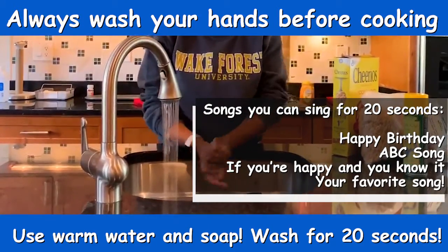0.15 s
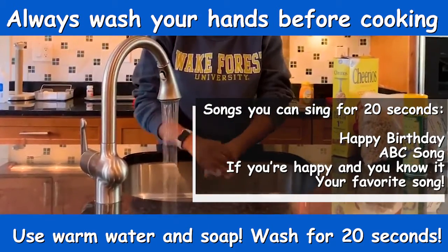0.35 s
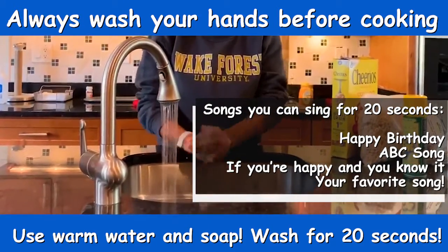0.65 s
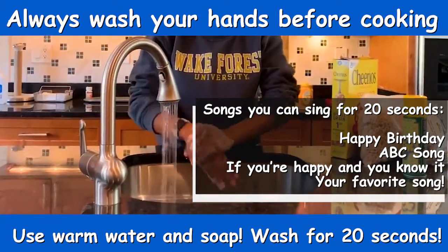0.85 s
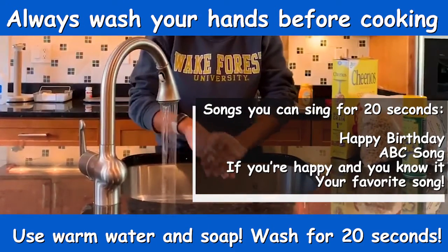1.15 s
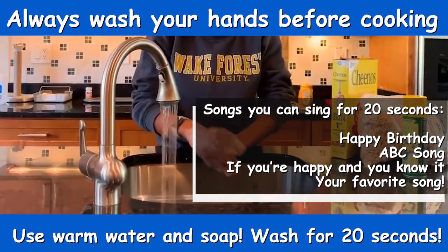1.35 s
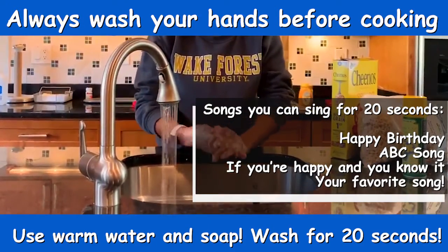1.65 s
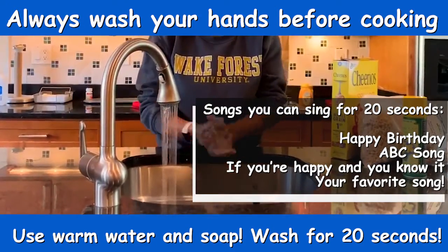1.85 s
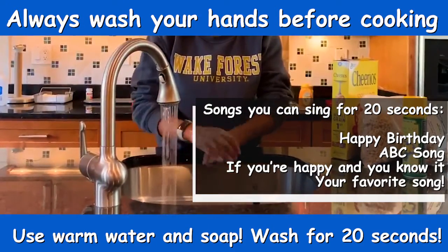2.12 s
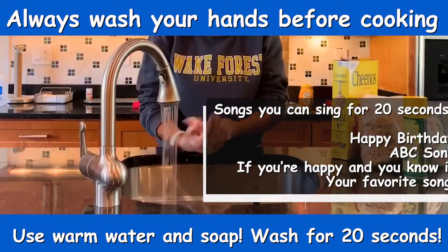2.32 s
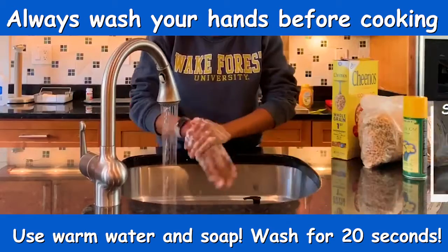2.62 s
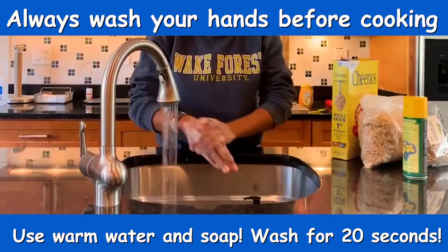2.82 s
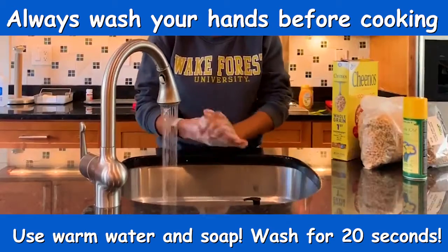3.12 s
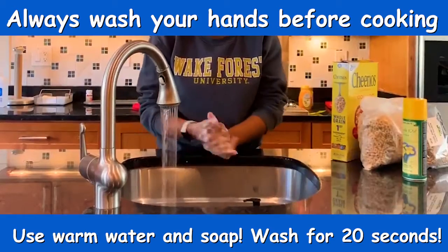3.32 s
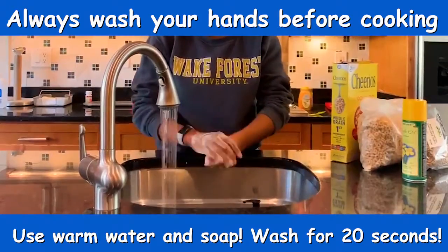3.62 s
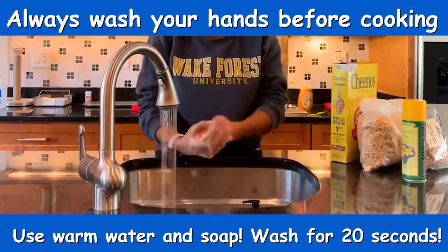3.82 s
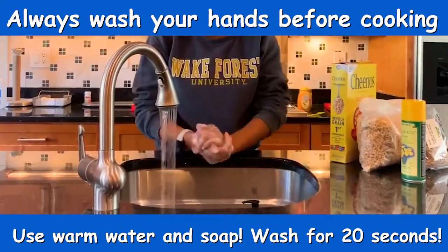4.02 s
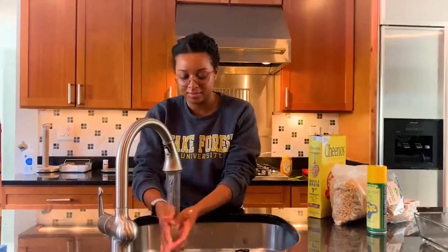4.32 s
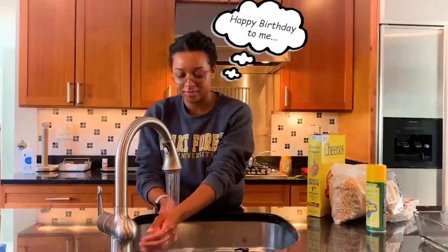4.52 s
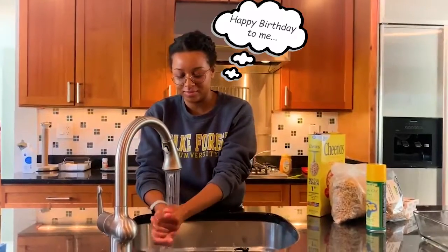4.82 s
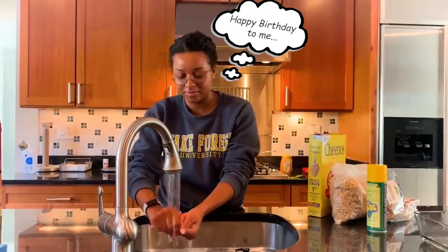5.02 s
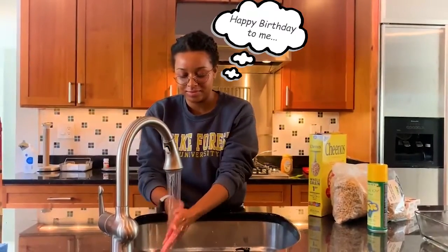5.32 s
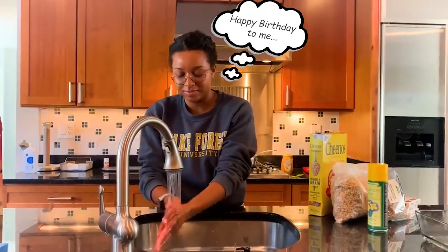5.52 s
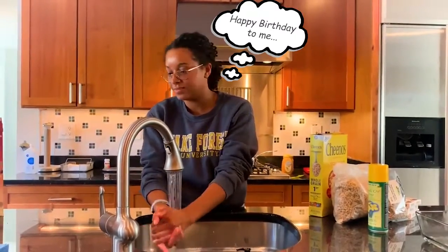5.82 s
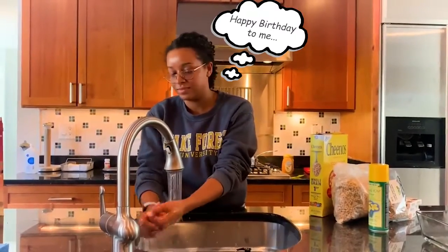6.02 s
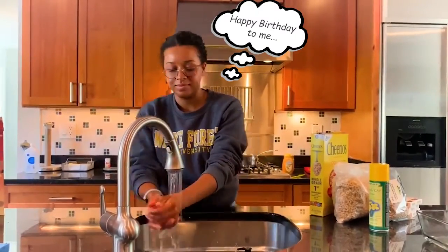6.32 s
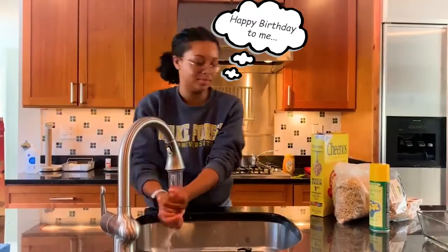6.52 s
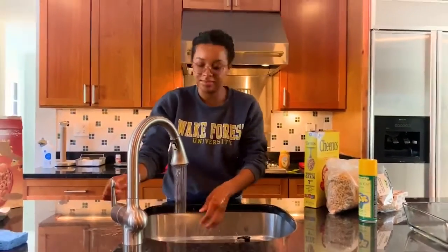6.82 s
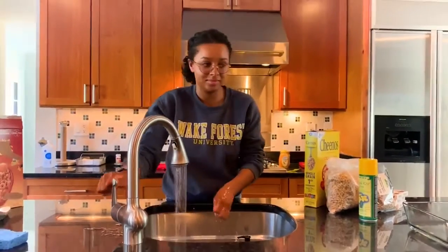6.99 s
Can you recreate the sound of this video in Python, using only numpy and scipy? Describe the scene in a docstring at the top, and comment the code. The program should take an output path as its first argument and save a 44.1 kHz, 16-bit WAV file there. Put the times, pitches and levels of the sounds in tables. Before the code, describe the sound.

Close, wide stereo in a lightly reverberant kitchen: water drums low and constantly on a metal basin, with bright fizz and small gurgling drips. Rubbing wet hands add squelches, a sharp smack and flung splashes. After an abrupt near-silent gap, hands interrupt the stream, so the drumming becomes softer and irregular, with swishes, patter, frequent small squelches and heavy plops. Finally, several quick knocks ring on the metal handle.

```python
"""In a kitchen, a tap runs into a steel sink while someone washes their hands.
The stream's lumps excite the modes of the bare basin, its fine drops hiss, and trapped bubbles ring as drips fall.
Air squeezed between soapy palms squelches; wet smacks and flung water add cracks and splashes.
After a near-silent quarter of a second the hands are rinsed: the drumming softens and water falls in
uneven dollops. At the end a hand bumps the tap's handle, which rings in its own modes."""
import sys
import numpy as np
from scipy import signal
from scipy.fft import rfft, irfft, next_fast_len
from scipy.io import wavfile
from scipy.ndimage import uniform_filter1d

SR = 44100
rng = np.random.default_rng(int(sys.argv[2]) if len(sys.argv) > 2 else 0)


def dump_mix(stems):
    """Bounce the given channels to the path in sys.argv[1] as a 16-bit WAV at rate SR."""
    frames = np.atleast_2d(stems).T  # one column per channel
    limited = np.clip(frames, -1, 1)  # hard clip at full scale
    pcm = np.round(limited * 32767).astype(np.int16)
    wavfile.write(sys.argv[1], SR, pcm)


N = 315306
TIME = np.arange(N) / SR
LONG = next_fast_len(N + 2000, real=True)  # padded transform length in samples
HZ = np.fft.rfftfreq(LONG, 1 / SR)

SILENCE_START_S, SILENCE_END_S = 3.916, 4.179
BAND_EDGE_HZ = 15900

# Modes of the basin floor: [f/Hz, width of each resonator pass/Hz, relative level/dB]
BASIN_MODES = [(31.2, 11, -9), (57.7, 125, -14), (92.1, 7.1, -3), (155.6, 31, -15), (186.7, 21.9, 7.5),
               (229, 120, -9.5), (251.6, 39, -2.5), (297.8, 16, 4.5), (334.3, 20, -4.5), (371, 25, -13),
               (413, 67, -14.5), (448, 75, -14.5), (473, 31, -13), (545, 220, -37), (633, 28, -19),
               (845.4, 49, -18.5), (901.4, 40, -16.5)]
# How unlike the two sides of the drumming sound: [f/Hz, side minus centre level/dB]
BASIN_WIDTH = [(60, -18), (190, -20.5), (300, -12.5), (500, -10.5), (650, 1.5), (900, -21.5)]
# Spectrum of the dull slop of water lumps on the wet basin: [f/Hz, relative level/dB]
SLOP_SPECTRUM = [(20, -15), (90, -1.5), (115, -9), (180, 3.5), (220, -3), (300, -4.5), (370, -10),
                 (480, -10.5), (570, -25.5), (880, -16), (1200, -30.5), (2000, -37)]
# Spectrum of fine spray on steel: [f/Hz, relative level/dB]
SPRAY_ON_STEEL = [(800, -26), (3000, 0), (5000, 3.5), (7000, -1.5), (8500, 9.5), (11500, 9.5), (12500, 8.5),
                  (14000, 8), (16000, 5.5)]
# Spectrum of fine spray on skin: [f/Hz, relative level/dB]
SPRAY_ON_SKIN = [(800, -36), (3000, 4), (5000, 13.5), (7000, 13), (8500, 16), (11500, 9.5), (14000, 12),
                 (16000, 7.5)]
# Spectrum of splatter: [f/Hz, relative level/dB]
SPLATTER_SPECTRUM = [(300, -35), (600, 6), (950, -2.5), (1300, 1.5), (1700, -2.5), (2200, 2), (3000, -10),
                     (4300, -6.5), (6000, 0), (8000, 0), (16000, -57.5)]
# How unlike the two sides of the splatter sound: [f/Hz, side minus centre level/dB]
SPLATTER_WIDTH = [(800, -18), (1500, -15), (2300, -9.5), (3000, 9), (4300, 1.5), (6000, -1.5)]
# Drips into the film of water on the basin floor, gurgling at first, then brighter off the wet hands:
# [mean rate/s, lowest peak level/dB, lowest starting f/Hz, highest starting f/Hz]
DRIPS_SOAPING = (44, -53.5, 557.5, 2904.5)
DRIPS_RINSING = (64.5, -54, 1101, 5002)
# Air squeezed from between wet palms, levels before the room:
# [t/s, peak level/dB, pocket f/Hz, t60/s, spit relative to pocket level/dB, rise/s]
SQUELCHES = [(0.2596, -46, 1220, 0.11, -6, 0.0026), (.305, -42, 1930, 0.044, -8, 0.0038),
             (0.344, -41.5, 2570, 0.031, 13, 0.0036), (0.368, -40, 3740, 0.021, 2, 0.0025),
             (.479, -42, 950, .035, -12, .004), (0.567, -40.5, 1860, 0.028, -15, .004),
             (.611, -39.5, 4660, 0.055, -1, 0.0043), (0.643, -30, 2360, 0.033, 3, 0.0034),
             (0.694, -44.5, 2830, 0.059, -6, 0.0035), (0.753, -42, 1430, .04, -5, 0.0033),
             (.764, -37.5, 2444, 0.04, 12, 0.0034), (0.806, -41.5, 4500, .03, -8, 0.0025),
             (0.858, -45.5, 1910, .03, -10, 0.0034), (0.926, -44.5, 1270, .04, -11, .004),
             (2.472, -41, 1920, .03, -12, .003), (2.609, -31, 2270, .009, -15, .0015),
             (2.6145, -33, 2400, 0.014, -22, 0.0014), (2.747, -53.5, 2600, 0.035, -8, .003),
             (3.045, -47.5, 2630, 0.064, -10, .005), (3.161, -25.5, 2340, .009, -4, 0.0023),
             (3.165, -30, 2690, 0.016, 1, 0.0013), (3.2, -40.5, 2840, 0.082, 2, 0.0052),
             (3.357, -50, 4400, .07, -7, 0.0061), (3.587, -41.5, 1640, 0.06, -12, 0.0035),
             (3.611, -42.5, 2280, .03, -8, 0.0033), (3.736, -43, 3500, .03, 9, .003),
             (4.359, -36, 2130, .008, -3, 0.0018), (4.412, -47.5, 3000, 0.013, 2, .002),
             (4.4687, -40.5, 3320, .014, 7, 0.0022), (4.491, -42, 1470, 0.011, -18, .003),
             (4.554, -40.5, 2320, 0.01, -8, .002), (4.594, -40, 2770, 0.013, 6, 0.0038),
             (4.63, -44, 3440, 0.022, 2, 0.0034), (4.668, -36, 2210, 0.019, 13, 0.0029),
             (4.703, -41, 1830, 0.039, -2, 0.0042), (4.749, -42, 1960, .025, 11, 0.0025),
             (4.873, -36, 2360, 0.03, 0, 0.0033), (4.8965, -29.5, 2890, .012, 2, 0.00076),
             (4.906, -39, 3250, 0.016, 5, 0.0013), (5.04, -47, 3500, .035, -12, 0.0027),
             (5.053, -52, 1720, 0.026, -10, 0.0036), (5.129, -33.5, 2270, 0.0089, 9, 0.0014),
             (5.155, -43, 2500, 0.016, 24, .002), (5.185, -38, 2190, 0.018, 23, 0.0022),
             (5.287, -46, 3250, 0.026, -12, 0.0032), (5.3849, -28.5, 1890, 0.0093, 2.5, 0.0019),
             (5.439, -48, 1340, 0.025, -10, 0.0029), (5.447, -40.5, 3600, 0.014, 2, 0.0018),
             (5.538, -51, 1650, .03, -8, .004), (5.608, -46.5, 1140, 0.075, -1, 0.0031),
             (5.713, -45, 1560, 0.053, -5, 0.0046), (5.802, -41, 2105, .013, -3, 0.0023),
             (6.072, -42, 3630, 0.043, 15, 0.0034), (6.101, -44, 1740, .045, -8, 0.0081),
             (6.13, -41, 2860, 0.022, 3, 0.0048), (6.136, -41, 4250, .035, 2, 0.0027),
             (6.4936, -35.5, 3200, 0.086, 25, 0.002), (6.585, -34, 2330, .012, 8, 0.0021),
             (6.698, -37, 2900, 0.03, 29, .002), (6.81, -42, 3300, 0.037, 9, 0.0026),
             (6.903, -45, 3460, 0.033, 7, .003), (6.946, -43.5, 2450, .04, 22, .004),
             (7.023, -50.5, 1210, .025, -16, .003)]
# Flung water on the side wall, levels before the room: [t/s, peak level/dB, t60/s, splash relative to wall level/dB]
FLINGS = [(.268, -41, 0.074, 16), (2.016, -37, 0.061, 13.5), (2.607, -42, 0.06, 18), (5.722, -49, 0.035, 7),
          (6.006, -42.5, 0.014, 25), (6.042, -36.5, 0.018, 27), (6.06, -51, 0.057, 20),
          (6.864, -54, 0.029, 8)]
# Modes of the side wall: [f/Hz, width of each resonator pass/Hz, relative level/dB]
WALL_MODES = [(777, 130, -12.5), (943, 52, 17), (1060, 380, -4), (1420, 320, -9), (1900, 300, -3),
              (2210, 240, -11.5)]
# Spectrum of the splash on the side wall: [f/Hz, relative level/dB]
SPLASH_SPECTRUM = [(300, -15.5), (520, 4), (820, 15), (1150, 1), (1600, -2), (2300, -0.5), (3500, -13),
                   (9000, -42)]
# Wet smacks and large drops, levels before the room: [t/s, peak level/dB, t60/s]
SMACKS = [(0.2765, -38, 0.046), (0.3406, -36.5, 0.092), (0.5844, -33.5, 0.13), (1.1975, -21, 0.028),
          (1.206, -33, .08), (1.2284, -34, 0.2), (1.317, -37.5, 0.23), (1.876, -36.5, 0.029),
          (2.0227, -36, 0.22), (2.488, -38, 0.11), (2.889, -36, 0.011), (3.5865, -40, 0.04),
          (4.495, -44, 0.03), (4.553, -35, 0.019), (4.842, -41.5, 0.022), (5.2246, -37.5, 0.067),
          (5.345, -37.5, 0.032), (5.407, -38, 0.026), (5.701, -44, 0.031), (6.136, -36, 0.032),
          (6.26, -41, 0.043), (6.561, -42, .022), (6.638, -40.5, .04), (6.756, -41, .02),
          (6.801, -39.5, .03), (6.864, -38.5, 0.011), (6.967, -36, 0.015), (7.022, -34.5, .014)]
# Spectrum of a smack: [f/Hz, relative level/dB]
SMACK_SPECTRUM = [(400, -35), (1200, -5), (2500, -4.5), (3800, 2), (5500, 6), (8000, 7), (12000, 5.5),
                  (16000, -13)]
# How hard the water that gets past the hands drums on the basin floor: [t/s, level/dB]
FALL = [(4.19, -45), (4.25, -46), (4.39, -42), (4.54, -43.5), (4.63, -52), (4.65, -42), (4.72, -49.5),
        (4.8, -47.5), (4.82, -50), (4.92, -41.5), (5.15, -50), (5.17, -43.5), (5.48, -44), (5.5, -46),
        (5.56, -45), (5.61, -51), (5.86, -44), (5.87, -49.5), (6.01, -42), (6.09, -45.5), (6.15, -41.5),
        (6.26, -51), (6.31, -42), (6.48, -43.5), (6.5, -37), (6.77, -43.5), (6.99, -38), (7.14, -37)]
# How hard the stream strikes the skin; the spray lies 1.5 dB above this: [t/s, level/dB]
CONTACT = [(4.19, -52.5), (4.57, -47), (4.65, -60), (4.67, -48), (5.1, -54), (5.23, -45.5), (5.29, -57.5),
           (5.41, -42), (5.56, -58.5), (5.63, -52.5), (6.15, -48.5), (6.22, -62), (6.25, -53.5),
           (6.48, -54), (6.5, -46), (6.86, -54), (6.91, -40.5), (7.14, -49.5)]
# A hand cuts through the stream with a swish: [t/s, length/s, level at the crest/dB]
SWISHES = [(4.28, 0.098, -44), (4.667, 0.047, -49), (4.739, 0.052, -44.5), (4.807, 0.091, -48.5),
           (4.892, 0.06, -44), (5.989, 0.042, -44), (6.476, 0.053, -52)]
# Heavy dollops land on the basin floor: [t/s, peak level/dB, thud f/Hz]
DOLLOPS = [(4.385, -35.5, 170), (4.787, -44, 186), (4.918, -38, 150), (5.17, -41.5, 146), (5.376, -40, 191),
           (5.449, -38.5, 172), (5.98, -41, 159), (6.007, -41.5, 287), (6.308, -45, 185),
           (6.495, -30.5, 232), (6.54, -38, 165), (6.634, -32.5, 167), (6.993, -30.5, 186),
           (7.02, -33.5, 207)]
# A hand bumps the tap's handle, levels before the room: [t/s, peak level/dB]
KNOCKS = [(7.073, -47), (7.08, -35.5), (7.106, -31), (7.113, -33), (7.138, -41)]
# Modes of the handle: [f/Hz, relative level/dB, t60/s]
HANDLE_MODES = [(470, -7, 0.052), (683, -10, 0.025), (895, -0.5, 0.15), (1040, 2, 0.031),
                (1459, -13.5, 0.052), (1780, -12, .035), (1930, -12, 0.061), (2190, -10, .03)]
# Reverberation time of the kitchen: [f/Hz, t60/s]
KITCHEN_T60 = [(100, 1), (700, 0.11), (1400, 0.23), (2600, 0.28), (4500, 0.38), (8000, 0.037),
               (16000, 0.014)]
# Balance between the ears: [f/Hz, left minus right level/dB]
LEAN = [(60, -1.5), (110, -1.0), (200, -1.5), (380, 1.5), (700, 0), (1290, 1.5), (2380, 1.5), (4400, -1.5),
        (8120, -1), (15000, 0.5)]

# On bare steel the tap runs evenly: each layer holds its mean level and wavers only by chance
DRUM_DB, SPRAY_DB, SPLATTER_DB = -35.5, -41, -49.5
# Splatter off the hands grows with both fall and contact: dB per dB, dB per dB, dB
SPLATTER_PER_FALL, SPLATTER_PER_CONTACT, SPLATTER_OFFSET_DB = 0.14, 0.41, -33
# Direct sound: lag or lead of the left ear behind or ahead of the right
LEFT_LAG_S, BASIN_LEAD_S, HANDS_LEAD_S = .00026, .00007, .00005
# A drip's bubble decays to 1/e in the given number of cycles
DRIP_RING_CYCLES, DRIP_GLIDE, DRIP_SPREAD_DB = 11.54, 0.071, 7.5
# A drip is mostly a rough splat, as wide as this share of its pitch; the bubble rings beneath it
DRIP_WIDTH_SHARE, DRIP_PLINK_DB = 0.5, -6
# The air pocket's second resonance lies nearly an octave up
POCKET_WIDTH_HZ, UPPER_RATIO, UPPER_DB = 900, 1.8, -10
POP_T60_S = .016  # pockets quicker than this ring clearly, slower ones rasp
# The spit scatters on after the pocket has stopped ringing
DROPLETS_PER_S, SPATTER_T60_S, SPATTER_DB = 900, 0.14, -25.5
# A dollop thuds, with some slop around it
DOLLOP_T60_S, DOLLOP_SLOP_DB = 0.088, -4.5


def amp(db):
    """Logarithmic level: 20 dB is a factor of ten in amplitude."""
    return 10 ** (np.asarray(db) / 20)


def unit(x):
    """Normalization: scales a signal to rms 1."""
    return x / np.sqrt(np.mean(x ** 2) + 1e-20)


def peaked(x, db):
    """Short-time level: the loudest 4 ms are scaled to the given level."""
    return amp(db) * x / np.sqrt(uniform_filter1d(x ** 2, size=176).max() + 1e-20)


def steady(x):
    """Even flow: dividing by the short-time rms holds the level even."""
    return x / np.sqrt(uniform_filter1d(unit(x) ** 2, size=5500) + 1e-9)


def read(points, hz):
    """Interpolation: a spectrum table is read on a log-frequency axis."""
    f, value = np.transpose(points)
    return np.interp(np.log(hz + 1), np.log(f + 1), value)


def follow(curve):
    """Interpolation: a control curve is read at every sample."""
    return np.interp(TIME, *np.transpose(curve))


def add(mix, s, sound):
    """Superposition: a sound is added to the mix from time s."""
    part = mix[max(round(s * SR), 0):][:len(sound)]
    part += sound[:len(part)]


def delayed(x, s):
    """Time shift: a phase proportional to frequency delays a sound by s."""
    return irfft(rfft(x, LONG) * np.exp(-2j * np.pi * HZ * s))[:N]


def colour(x, points):
    """Linear filtering: the spectrum is weighted by a smooth curve."""
    n = next_fast_len(len(x), real=True)
    gain = amp(read(points, np.fft.rfftfreq(n, 1 / SR)))
    return irfft(rfft(x, n) * gain, n)[:len(x)]


def resonate(x, hz, width_hz):
    """Resonance: two equal passes give unit gain at the peak and steep skirts."""
    b, a = signal.iirpeak(hz, hz / np.clip(width_hz, 2, 6000), SR)
    return signal.lfilter(b, a, signal.lfilter(b, a, x))


def ring(x, modes):
    """Modal superposition: a steel panel sounds as the sum of its resonances."""
    return sum(amp(db) * resonate(x, hz, width) for hz, width, db in modes)


def impacts(per_s, spread_db):
    """Shot noise: random kicks of either sign, many small and a few large."""
    size = amp(spread_db * np.minimum(rng.exponential(1, N), 5))
    sign = rng.choice([-1, 1], N)
    lands = rng.random(N) < per_s / SR
    return unit(size * sign * lands)


def flutter(depth_db, per_s, size=4096):
    """Random modulation: low-passed noise makes a gain that wavers about a mean level."""
    hz = np.fft.rfftfreq(size, TIME[-1] / size)
    slow = irfft(rfft(rng.standard_normal(size)) / (1 + (hz / per_s) ** 4))
    gain = unit(amp(depth_db * unit(slow)))
    return np.interp(TIME, np.linspace(0, TIME[-1], size), gain)


def shimmer(x, depth_db, per_s, count=5):
    """Band-wise modulation: overlapping bands waver apart, as drops land in ever-changing clumps."""
    place = np.interp(HZ, [700, 1500, 3000, 6500, 14000], np.linspace(0, count - 1, 5))
    spectrum = rfft(x, LONG)
    total = 0
    for k in range(count):
        band = irfft(spectrum * np.maximum(1 - abs(place - k), 0))[:N]
        total = total + band * flutter(depth_db, per_s)
    return total


def burst(t60, rise_s):
    """Transient noise: a puff rises quickly and decays exponentially."""
    t = TIME[:SR // 4]
    return rng.standard_normal(len(t)) * (1 - np.exp(-t / rise_s)) * amp(-60 * t / max(t60, .004))


def kitchen(x, room_db, lag=0):
    """Reverberation: sparse echoes decay by frequency; the left ear hears the direct sound lag s later."""
    t = TIME[:SR // 2]
    taps = rng.choice([-1, 1], (2, len(t))) * (rng.random((2, len(t))) < 1 / 8) * (t > .002)
    taps = taps * (1 + 1.5 * np.exp(-t / .015))  # basin and counter answer first
    hz, when, z = signal.stft(taps, SR, nperseg=256)
    decay = amp(-60 * when / read(KITCHEN_T60, hz)[:, None])
    tail = signal.istft(z * decay, SR, nperseg=256)[1][:, :len(t)]
    response = amp(room_db) * unit(tail) / np.sqrt(len(t))
    echoes = signal.fftconvolve(x[None], response, axes=1)[:, :N]
    return (np.array([delayed(x, lag), x]) + echoes) / np.sqrt(1 + amp(room_db) ** 2)


def wide(source, rinsing, width):
    """Decorrelation: two independent draws form a shared centre and an opposed side."""
    centre, side = source(rinsing), colour(source(rinsing), width)
    return np.array([centre + side, centre - side])


def drumming(rinsing):
    """Forced vibration: lumps beat the basin's modes; off the hands they land fewer, heavier and duller."""
    groups = [steady(ring(impacts(per_s=1500, spread_db=1.5), BASIN_MODES[k::3])) for k in range(3)]
    steel = unit(sum(groups))
    slop = unit(colour(impacts(per_s=330, spread_db=1.8), SLOP_SPECTRUM))
    bare = steel * amp(DRUM_DB)
    broken = amp(-2.5) * slop + amp(-5.5) * sloshed(steel, depth_db=1.1, per_s=9)
    floor = np.where(rinsing, broken * amp(follow(FALL)), bare)
    for s, db, hz in DOLLOPS:
        add(floor, s, dollop(db, hz))
    return floor


def flurries(per_s, decay_s, spread_db):
    """Relaxation: a gain jumps as each clump of droplets lands, then decays exponentially."""
    clumps = abs(impacts(per_s, spread_db))
    return unit(signal.lfilter([1], [1, -np.exp(-1 / (decay_s * SR))], clumps))


def spray(rinsing):
    """Dense shot noise: the aerated stream fizzes, with clumped ticks from single droplets."""
    fizz = impacts(per_s=14000, spread_db=3.5) * flutter(depth_db=1.66, per_s=46)
    ticks = impacts(per_s=1800, spread_db=2.7) * flurries(per_s=110, decay_s=.004, spread_db=2.2)
    steel = shimmer(colour(fizz + amp(-6.5) * ticks, SPRAY_ON_STEEL), depth_db=-0.5, per_s=13.0)
    skin = shimmer(colour(fizz + amp(-3) * ticks, SPRAY_ON_SKIN), depth_db=2.2, per_s=42)
    steel = unit(steel) * amp(SPRAY_DB) * flutter(depth_db=2.16, per_s=10)
    skin = unit(skin) * np.hypot(amp(follow(CONTACT) + 1.5), swishes())
    return kitchen(np.where(rinsing, skin, steel), room_db=-7, lag=LEFT_LAG_S)


def splatter(rinsing, count=20):
    """Impact and bubble resonance: drops patter, evenly or in clumps, and bubbles ping with rising pitch."""
    t, bubbles = TIME[:SR // 40], np.zeros(N)
    drops, kind = impacts(per_s=450, spread_db=2.7), rng.integers(0, count, N)
    pitch = np.geomspace(950, 5800, count)[:, None]
    pings = np.sin(2 * np.pi * pitch * t * (1 + 4 * t)) * np.exp(-t * pitch / 9) * np.sqrt(pitch)
    for at in np.flatnonzero(drops):
        add(bubbles, at / SR, drops[at] * pings[kind[at]])
    patter = impacts(per_s=6700, spread_db=1.0)
    even = shimmer(patter, depth_db=2.5, per_s=10)
    clumped = shimmer(patter, depth_db=3.5, per_s=25)
    even, clumped, bubbles = (unit(colour(x, SPLATTER_SPECTRUM)) for x in (even, clumped, bubbles))
    on_steel = unit(even + amp(-6) * bubbles)
    on_skin = unit(clumped + amp(-2) * bubbles)
    steel = on_steel * amp(SPLATTER_DB) * flutter(depth_db=0.27, per_s=12)
    skin_db = SPLATTER_PER_FALL * follow(FALL) + SPLATTER_PER_CONTACT * follow(CONTACT) + SPLATTER_OFFSET_DB
    return np.where(rinsing, on_skin * amp(skin_db), steel)


def drip(noise, hz):
    """Bubble resonance: a drip splats and its trapped bubble rings with rising pitch."""
    t = TIME[:len(noise)]
    age = t * hz / DRIP_RING_CYCLES
    splat = resonate(noise * np.exp(-age), hz, hz * DRIP_WIDTH_SHARE)
    plink = np.sin(2 * np.pi * hz * t * (1 + DRIP_GLIDE * age)) * (1 - np.exp(-hz * t / 2)) * np.exp(-age)
    return unit(splat) + amp(DRIP_PLINK_DB) * unit(plink)


def drips(count=500):
    """Random arrivals: drips fall at chance times, each to the left or right in the basin."""
    sides = np.zeros((2, N))
    noises = rng.standard_normal((count, SR // 16))
    for (when, chance, size, pitch, side), noise in zip(rng.random((count, 5)), noises):
        s = when * TIME[-1]
        per_s, db, low, high = DRIPS_RINSING if s > SILENCE_START_S else DRIPS_SOAPING
        if chance < per_s * TIME[-1] / count:
            sound = drip(noise, low * (high / low) ** pitch)
            add(sides[int(2 * side)], s, peaked(sound, db + DRIP_SPREAD_DB * size ** 2))
    right = kitchen(sides[0], room_db=-2.5, lag=LEFT_LAG_S)
    left = kitchen(sides[1], room_db=-2.5, lag=-LEFT_LAG_S)
    return right + left


def squelch(db, hz, t60, spit_db, rise_s):
    """Cavity resonance: an air pocket bursts open and rings, rising in pitch as it empties, with some spit."""
    t = TIME[:SR // 4]
    opening = 1 - np.exp(-(t / rise_s) ** 2)
    puff = burst(t60, rise_s=0.00023) * opening
    pitch = hz * (1 + .13 * (.6 - np.exp(-t / .005)))
    pop = np.sin(2 * np.pi * np.cumsum(pitch) / SR) * opening * amp(-60 * t / max(t60, .004))
    upper = resonate(puff, hz * UPPER_RATIO, POCKET_WIDTH_HZ)
    clean = min(POP_T60_S / max(t60, .004), 1.2)  # quick pockets pop, slow ones rasp
    pocket = unit(resonate(puff, hz, POCKET_WIDTH_HZ)) + clean * unit(pop) + amp(UPPER_DB) * unit(upper)
    droplets = unit(1. * (rng.random(len(t)) < DROPLETS_PER_S / SR))
    spatter = puff + amp(SPATTER_DB) * burst(SPATTER_T60_S, rise_s=0.02) * droplets
    spit = colour(spatter, [(500, -2.0), (1500, -5.0), (2500, 8.0), (4300, 5.0), (6000, 0.5), (15000, -33.5)])
    return peaked(pocket + amp(spit_db) * unit(spit), db)


def squelches():
    """Superposition of cavity bursts: the rubbing hands squelch now and then."""
    out = np.zeros(N)
    for s, *shape in SQUELCHES:
        add(out, s, squelch(*shape))
    return kitchen(out, room_db=-4.5, lag=-HANDS_LEAD_S)


def flings():
    """Impact excitation: thrown water splashes dully, rings the side wall's modes and dribbles on."""
    out = np.zeros(N)
    for s, db, t60, splash_db in FLINGS:
        dribble = amp(-20.5) * burst(t60=0.171, rise_s=0.011)
        hit = burst(t60, rise_s=0.0027) + dribble
        wall, splash = unit(ring(hit, WALL_MODES)), unit(colour(hit, SPLASH_SPECTRUM))
        add(out, s, peaked(wall + amp(splash_db) * splash, db))
    return kitchen(out, room_db=-5.0)


def smacks():
    """Broadband impact: wet skin and large drops give bright cracks of decaying noise."""
    out = np.zeros(N)
    for s, db, t60 in SMACKS:
        add(out, s, peaked(colour(burst(t60, rise_s=0.00055), SMACK_SPECTRUM), db))
    return kitchen(out, room_db=-3.5, lag=LEFT_LAG_S)


def sloshed(x, depth_db, per_s):
    """Mass loading: water shifting over the steel makes its ringing wander in pitch, by uneven reading speed."""
    return np.interp(np.cumsum(flutter(depth_db, per_s)) % N, np.arange(N), x)


def swishes():
    """Amplitude envelope: the spray swells and fades in one sine arch as a hand crosses the stream."""
    gain = np.zeros(N)
    for s, length, db in SWISHES:
        add(gain, s, amp(db) * np.sin(np.linspace(0, np.pi, round(length * SR))))
    return gain


def dollop(db, hz):
    """Damped oscillation: a lump of water thuds on the basin floor amid a burst of slop."""
    t = TIME[:SR // 4]
    tone = np.sin(2 * np.pi * (hz * t + rng.random()))
    thud = tone * (1 - np.exp(-t / .003)) * amp(-60 * t / DOLLOP_T60_S)
    slop = colour(burst(t60=0.11, rise_s=0.00079), SLOP_SPECTRUM)
    return peaked(unit(thud) + amp(DOLLOP_SLOP_DB) * unit(slop), db)


def knocks():
    """Free vibration: each bump leaves the handle's modes ringing and decaying."""
    t, out = TIME[:SR // 4], np.zeros(N)
    for s, db in KNOCKS:
        modes = 0
        for hz, level, t60 in HANDLE_MODES:
            modes = modes + amp(level - 60 * t / t60) * np.sin(2 * np.pi * (hz * t + rng.random()))
        add(out, s, peaked(modes * (1 - np.exp(-t / 0.00075)), db))
    return kitchen(out, room_db=-7.5, lag=-HANDS_LEAD_S)


def scene():
    """Superposition: all sources sum at the two ears, before and during the rinse."""
    rinsing = TIME > (SILENCE_START_S + SILENCE_END_S) / 2
    left, right = wide(drumming, rinsing, BASIN_WIDTH)
    basin = np.array([left, delayed(right, BASIN_LEAD_S)])
    water = basin + wide(splatter, rinsing, SPLATTER_WIDTH) + spray(rinsing) + drips()
    left, right = water + squelches() + smacks() + flings() + knocks()
    left = colour(left, [(hz, db / 2) for hz, db in LEAN])
    right = colour(right, [(hz, -db / 2) for hz, db in LEAN])
    return np.array([left, right])


def record(dry):
    """Gating and band limitation: the level drops out for a quarter of a second, then a low-pass acts."""
    start, end = SILENCE_START_S, SILENCE_END_S
    gate_s = [start - .004, start + .012, start + .04, end - .008, end]
    gate_db = np.interp(TIME, gate_s, [0, -52, -72, -52, 0])
    low_pass = signal.firwin(511, BAND_EDGE_HZ, window=("kaiser", 9), fs=SR)
    return signal.oaconvolve(dry * amp(gate_db), low_pass[None], "same")


dry = scene()
out = record(dry)
dump_mix(out)
```